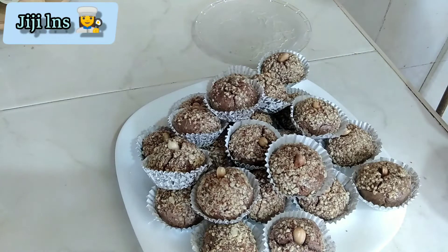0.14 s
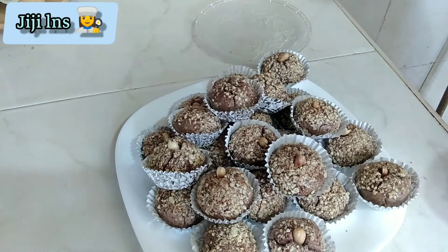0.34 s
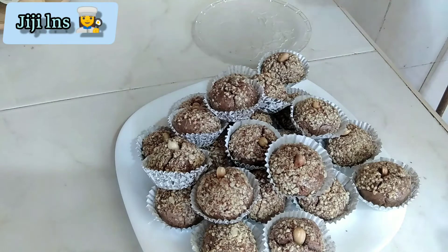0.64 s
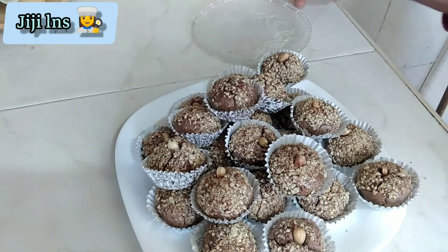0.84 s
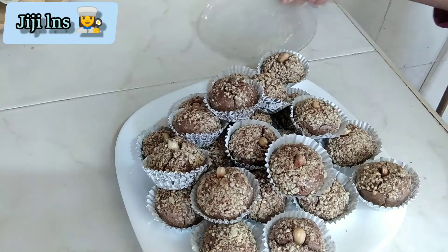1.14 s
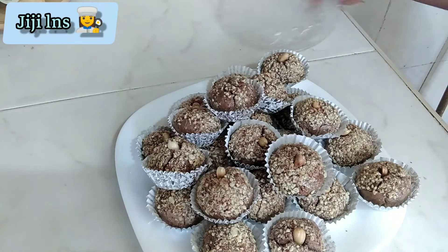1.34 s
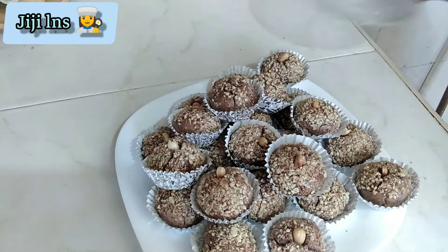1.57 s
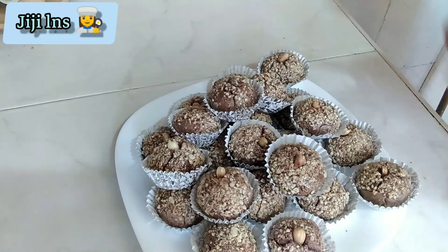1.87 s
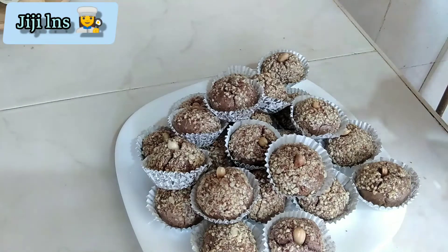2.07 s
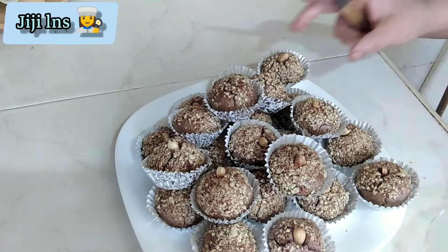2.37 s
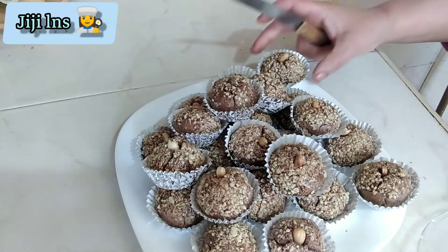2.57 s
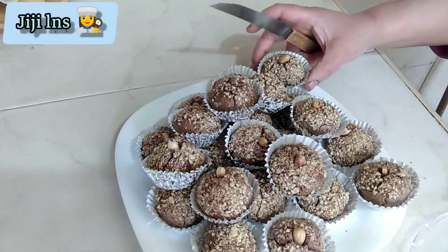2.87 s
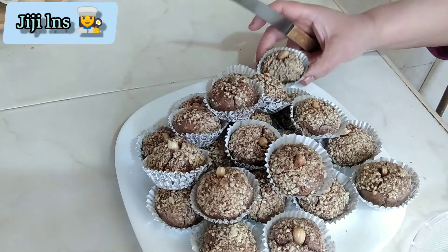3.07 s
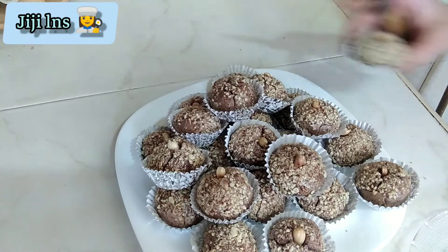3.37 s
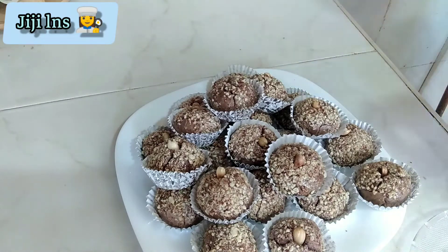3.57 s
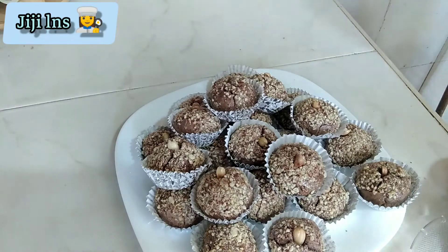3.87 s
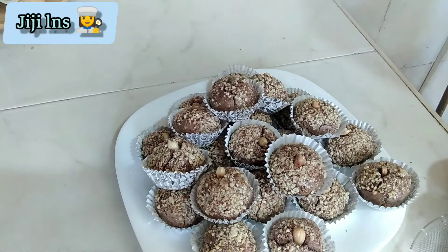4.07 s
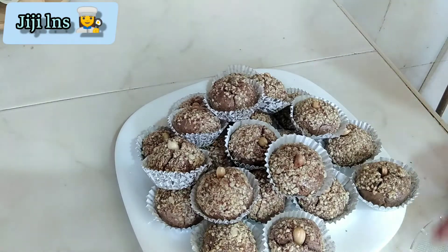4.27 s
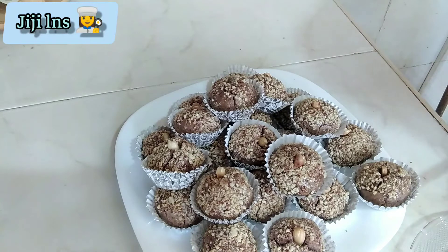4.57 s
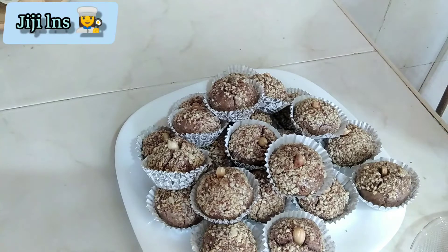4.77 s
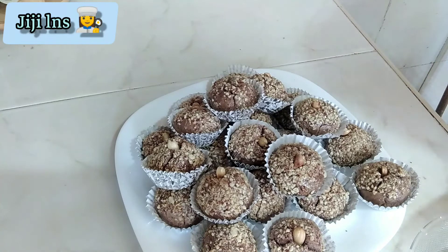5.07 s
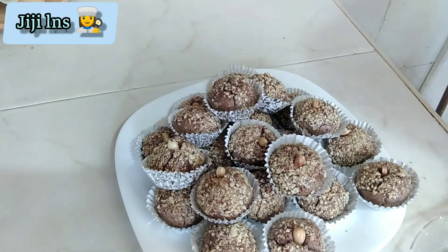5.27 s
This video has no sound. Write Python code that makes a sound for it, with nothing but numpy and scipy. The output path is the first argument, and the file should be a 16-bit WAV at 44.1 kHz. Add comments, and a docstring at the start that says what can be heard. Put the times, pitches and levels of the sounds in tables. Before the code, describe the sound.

A quiet kitchen, heard in stereo through a nearby phone: soft still air, a faint wavering low hum and deeper rumble throughout. The first second has only slight rustles, a short swish near 0.6 s and a faint low judder around 0.9 s. From about 1.15 to 1.45 s a small glass plate drags over tile, gritty and stuttering, its ring catching in little clicks. A lull follows, with a soft swish near 1.9 s. At 2.5 s the plate is set down with a firm glassy clack, then rocks in light irregular taps with faint low notes until 3.35 s; a bright paper cup snap and swish cut in near 3.15 s. A cluster of knocks comes at 3.4-3.47 s, and a hard, bright clink at 3.9 s. Small paper ticks and swishes follow around 4.1-4.5 s, low buzzing judders at 4.8 and 5.15 s, and a very faint last tap near 5.3 s. Short tiled-room echo.

```python
"""A quiet kitchen hums throughout, with still air, soft rustles and brief low judders from the start.
Near 1.2 s the foot ring of a small glass plate drags over a tiled counter: grit scrapes, the ring catches.
From 2.4 s paper cups tick as creases snap; the plate is put down at 2.5 s and rocks to rest with low plate notes.
It is knocked again near 3.4 and 3.9 s, then more paper ticks, swishes, judders and one last light tap follow.
Plate and paper echo off tiled walls, and a phone hears it all through two ports."""
import sys
import numpy as np
from scipy import signal
from scipy.fft import rfft, irfft
from scipy.io import wavfile
from scipy.ndimage import uniform_filter1d

SR = 44100
rng = np.random.default_rng(int(sys.argv[2]) if len(sys.argv) > 2 else 0)


def elevation(decibels):
    """Turn decibel levels (scalar or array-like) into linear amplitude ratios."""
    levels = np.asarray(decibels, float)
    return 10 ** (levels / 20)


def waveform_to_disk(signal):
    """Save audio, clipped to [-1, 1], as 16-bit WAV at the path in sys.argv[1]."""
    frames = np.transpose(np.atleast_2d(signal))
    scaled = np.clip(frames, -1, 1) * 32767
    samples = np.round(scaled).astype(np.int16)
    wavfile.write(sys.argv[1], SR, samples)


N = 238729  # length in samples
T = np.arange(N) / SR  # time in seconds

# Colour of the still air. Each row: frequency in Hz, relative level in dB.
AIR_COLOUR = [(26, -30.5), (45, -6.5), (145, -15), (241, -19.5), (421, -24), (511, -21), (852, -24),
              (962, -25.5), (1140, -25), (1450, -26), (1680, -28.5), (2200, -28.5), (5150, -38.5),
              (12300, -37), (15000, -49)]
# How alike the noise is at the two ports. Each row: frequency in Hz, correlation from -1 to 1.
PORT_LIKENESS = [(60, 0.92), (300, 0.71), (700, 0.96), (1100, -0.32), (1600, -0.17), (5600, 0.44),
                 (6900, 0.81), (10000, 1), (15000, 0.41)]
# Swells of the low hum. Each row: loudest time in seconds, relative level in dB,
# then rise and fall, each in seconds per 20 dB.
HUM_SWELLS = [(.55, -76.5, .2, .9), (1.56, -55, 0.19, .4), (1.94, -66, 0.5, .2), (2.14, -63.5, 0.11, .15),
              (2.66, -52.5, 0.33, .25), (3.69, -57.5, .25, .45), (4.83, -61, .35, .15),
              (5.2, -66.5, .4, .9)]
# Colour of paper and cloth rustle. Each row: frequency in Hz, relative level in dB.
RUSTLE_COLOUR = [(700, -48), (2000, -10), (3200, -10), (6000, -8.5), (7000, -3.5), (10100, -2.5),
                 (12000, -15.5), (14200, -8.5), (15200, -37.5)]
# Paper and sleeve swishes. Each row: loudest time in seconds, relative level in dB,
# then rise and fall, each in seconds per 20 dB.
SWISHES = [(.1, -78.5, 1, 1), (.35, -74.5, 1, 0.054), (.575, -61, 0.041, 0.04), (.62, -105, 0.11, 0.18),
           (.94, -78.5, 0.017, 0.32), (1.945, -68, .03, 0.082), (2.09, -77.5, .06, .2),
           (3.09, -70.5, 0.4, 0.017), (3.175, -46.5, 0.017, 0.039), (3.38, -60, 0.45, 0.13),
           (3.79, -74.5, 0.25, 0.11), (4.224, -59, 0.083, 0.042), (4.27, -75.5, 0.045, .15),
           (4.55, -66, .17, .3), (4.8, -61, 0.032, 0.068), (5.1, -79, 0.45, 0.14), (5.39, -72, .1, .3)]
# A hand or blade judders on the counter. Each row: start in seconds, level in dB, slips per second,
# length in seconds, scuff level in dB relative to the row's level.
JUDDERS = [(0, -73, 110, 0.047, 11.5), (.88, -64, 120, 0.083, -28), (4.777, -54.5, 163, 0.096, -2),
           (5.153, -54, 105, 0.173, -25), (5.27, -76, 105, 0.044, 13)]
# Overtones of a judder. Each row: multiple of the slip rate, relative level in dB.
JUDDER_OVERTONES = [(1, -0.5), (2, -9.5), (3, -19)]
# Colour of a judder's dull scuff. Each row: frequency in Hz, relative level in dB.
SCUFF_COLOUR = [(50, 12.5), (120, 13), (500, 1.5), (1500, -9.5), (3000, -41.5)]
# Ways the glass plate can ring (its modes), as three matching lists:
# frequency in Hz, relative level in dB, and free ring time in seconds to fall 60 dB.
PLATE_HZ = [530, 625, 715, 1080, 1150, 1195, 1247, 1400, 1462, 1575, 1650, 1790, 2000, 2304, 2395, 3010,
            3374, 3444, 3740, 5390, 5455, 5834, 7055, 7845, 7915, 7990, 8080, 9050, 10600, 10895, 14120]
PLATE_DB = [-21, -13.5, -7, -17, -20.5, -9, -5, -7, -14, -6.5, -5, -2, 3.5, 0.5, -10, -2, -4.5, 5, -6.5, -8,
            -7, -17, -24, -15, -8, -0.5, -9, -16.5, -13.5, -14, -16]
PLATE_RING_S = [0.13, 0.066, 0.041, .1, 0.26, 0.11, 0.1, 0.09, 0.13, 0.12, 0.092, 0.045, 0.05, 0.11, 0.095,
                0.041, 0.13, 0.13, 0.1, 0.15, 0.074, 0.24, 0.083, 0.047, 0.061, 0.04, 0.13, 0.097, 0.12,
                0.21, 0.036]
# Scraping strokes. Each row: loudest time in seconds, relative level in dB, rise and fall in seconds per 20 dB,
# then relative levels of the rim modes and the treble modes in dB.
STROKES = [(1.183, -53.5, .05, 0.06, -10, 6.5), (1.235, -52, 0.041, .05, -12, -0.5),
           (1.302, -43.5, 0.094, 0.038, -20, 0.5), (1.409, -45.5, 0.063, 0.056, -12, 4),
           (2.536, -51, 0.0074, 0.19, -10, -23.5), (2.704, -51, 0.09, 0.044, -9, 1.5),
           (3.05, -67, 0.35, 0.11, 8, -24), (3.861, -52.5, 0.011, .04, 5.5, 12.5)]
# Colour of grit under the foot ring. Each row: frequency in Hz, relative level in dB.
GRIT_COLOUR = [(150, -41.5), (350, -9), (600, -0.5), (900, -8.5), (1400, -2), (2400, -1), (4500, -11),
               (5500, -29.5)]
# Colour of a sharp tile crack. Each row: frequency in Hz, relative level in dB.
CRACK_COLOUR = [(3000, -29.5), (4500, 2.5), (6000, -3.5), (9500, -6), (11300, -7.5), (12000, -28),
                (14500, -23.5)]
# Colour of a tile thud. Each row: frequency in Hz, relative level in dB.
THUD_COLOUR = [(150, -35), (300, -13.5), (420, -16), (600, -8), (900, -5.5), (1300, 1), (2200, -14.5),
               (2750, -4.5), (3700, -3), (4500, -28.5)]
# Modes of the counter slab. Each row: frequency in Hz, relative level in dB, seconds to fall 60 dB.
COUNTER_MODES = [(110.5, -25.5, 0.18), (176, -22, 0.066), (313, -15.5, 0.059)]
# The dragged foot ring catches on the tile. Each row: start in seconds, strength in dB,
# relative level of the treble modes in dB.
CATCHES = [(1.18, -34, -22), (1.258, -37, -15), (1.296, -34, -23), (1.318, -30, -37), (1.335, -27.5, -9.5),
           (1.371, -29.5, -25), (1.394, -34.5, -16), (1.424, -38.5, 3.5)]
# The plate is set down or knocked on tile. Each row: start in seconds, strength in dB,
# then relative levels of the rim modes, treble modes and thud in dB.
BLOWS = [(2.481, -21, -7, -2, -2.5), (3.406, -33, 6, -1.5, 4), (3.454, -29, 1, -2, 4),
         (3.468, -30, -19, -31, -1), (3.874, -20, 5, 8, 1.5), (3.953, -44, -3, 8.5, -8)]
# Light taps as the plate rocks or is nudged. Each row: start in seconds, strength in dB,
# relative level of the treble modes in dB.
TAPS = [(2.633, -38, -12), (2.669, -36.5, -26), (2.705, -33, -11.5), (2.765, -38, -14.5), (2.835, -39, -21),
        (2.868, -37.5, -24), (2.906, -49, -17), (2.945, -41.5, -15), (2.979, -40.5, -14.5),
        (3.016, -37, -23), (3.067, -43, -25), (3.091, -42, -20), (3.167, -39, -7), (3.228, -44.5, -16),
        (3.261, -45.5, -18), (3.315, -48, -10), (3.346, -47.5, -15), (5.282, -54, -30)]
# Paper cup ticks. Each row: start in seconds, strength in dB.
TICKS = [(2.4082, -51), (2.8697, -43.5), (3.04, -46.5), (3.0846, -48), (3.1246, -38.5), (3.1364, -44),
         (3.1448, -26.5), (4.0727, -40), (4.2072, -37), (4.222, -37.5), (4.281, -51), (4.3038, -50.5),
         (4.4826, -50), (4.5424, -44), (4.9576, -56.5), (5.1108, -57.5), (5.1806, -47.5), (5.2804, -49),
         (5.3727, -53)]
# Low notes of the plate as it rocks. Each row: frequency in Hz, relative starting level in dB,
# change in dB per second.
LOW_PLATE_NOTES = [(563, -59, -24), (720, -67.5, 9.5)]
# Echo time of the kitchen. Each row: frequency in Hz, seconds to fall 60 dB.
ROOM_FADE = [(100, 0.5), (1000, 0.35), (4000, 0.31), (12000, 0.24)]
# Tilt between the ports. Each row: frequency in Hz, left minus right in dB.
LEFT_TILT = [(60, -1.5), (3000, 0.5), (7500, -3), (8600, -5.5), (9600, 8), (12000, 5), (15000, 2.5)]


def along(table, hz):
    """Read a (Hz, value) table on a logarithmic frequency axis."""
    f, v = np.transpose(table)
    return np.interp(np.log(np.maximum(hz, 1)), np.log(f), v)


def colour(x, table):
    """Filter a sound by a (Hz, dB) table."""
    size = x.shape[-1]
    gain = elevation(along(table, np.fft.rfftfreq(size, 1 / SR)))
    return irfft(rfft(x) * gain, size)


def unit(x):
    """Scale a sound to an average strength (rms) of 1."""
    return x / np.sqrt(np.mean(x ** 2))


def diffuse(size):
    """White noise from all round: the ports share only part of each band."""
    alike = np.clip(along(PORT_LIKENESS, np.fft.rfftfreq(size, 1 / SR)), -.99, .99)
    shares = np.sqrt([(1 + alike) / 2, (1 - alike) / 2])
    mid, side = rfft(rng.standard_normal((2, size))) * shares
    return irfft(np.array([mid + side, mid - side]), size)


def walk(rate):
    """Random levels, drawn about rate times a second and joined by slopes."""
    k = int(SR / rate)
    steps = np.repeat(rng.standard_normal(N // k + 1), k)
    return uniform_filter1d(steps, k)[:N]


def add(out, s, x):
    """Mix a short sound in at time s."""
    i = int(s * SR)
    out[..., i:i + x.shape[-1]] += x[..., :N - i]


def swell(s, db, rise_s, fall_s):
    """Gain that climbs to db at time s and dies away, 20 dB per rise_s and fall_s."""
    before = (s - T) / max(rise_s, .001)
    after = (T - s) / max(fall_s, .001)
    return elevation(db - 20 * np.where(T < s, before, after))


def fade(t, seconds):
    """Gain that falls 60 dB in the given time."""
    return 1000. ** (-t / seconds)


def still_air():
    """Steady noise from all round, with a slowly wandering level."""
    return unit(colour(diffuse(N), AIR_COLOUR)) * elevation(-65.5 + .7 * walk(1.5))


def low_noise(low_hz, high_hz):
    """A narrow band of low noise with an rms of 1."""
    band = signal.butter(2, [low_hz, high_hz], "bandpass", fs=SR, output="sos")
    return unit(signal.sosfilt(band, rng.standard_normal(N)))


def drone():
    """A wavering hum, part tone and part narrow noise, over a deeper rumble."""
    noise = low_noise(73, 83)
    hum_hz = 78.3 + 2.38 * walk(6)
    tone = np.sin(2 * np.pi * np.cumsum(hum_hz) / SR)
    hum_gain = elevation(-78.5) + sum(swell(*row) for row in HUM_SWELLS)
    rumble = low_noise(19, 33) * elevation(-61.5 + 2.5 * walk(5))
    return (.6 * noise + 1.1 * tone) * hum_gain + rumble


def rustle():
    """Dense tiny crackles of paper and cloth; each paper tick also leaves a short rustle."""
    crackle_db = 2.4 * np.minimum(rng.exponential(1, N), 8)  # capped random spikes
    grain = diffuse(N) * elevation(1.36 * walk(51) + crackle_db)
    # 18.5 dB under each tick's strength, falling 20 dB in 0.018 s
    after_ticks = sum(swell(s, db - 18.5, 0, 0.018) for s, db in TICKS)
    gain = elevation(-90.5) + sum(swell(*row) for row in SWISHES) + after_ticks
    return unit(colour(grain, RUSTLE_COLOUR)) * gain * elevation(3.5)


def judders():
    """Brief low buzzes from sticking and slipping, with a dull scuff."""
    out = np.zeros(N)
    for s, db, rate, length, scuff_db in JUDDERS:
        t = T[:int(length * SR)]
        buzz = sum(elevation(d) * np.cos(2 * np.pi * k * rate * t) for k, d in JUDDER_OVERTONES)
        scuff = unit(colour(rng.standard_normal(len(t)), SCUFF_COLOUR))
        rise_and_fall = np.sin(np.pi * t / length)
        add(out, s, elevation(db) * (buzz + elevation(scuff_db) * scuff) * rise_and_fall)
    return out


def contact(hz, rim_db, treble_db, from_hz, octaves):
    """Gain of a mode: low bending modes stay full, rim_db phases in above from_hz, treble_db rules over 4500 Hz."""
    rim = np.clip(np.log2(hz / from_hz) / octaves, 0, 1)
    return elevation(np.where(hz > 4500, treble_db, rim * rim_db))


def scrape():
    """Grit under the foot ring catches and slips, shaking all the plate's modes."""
    push = np.array([swell(*row[:4]) for row in STROKES]) + 1e-9
    spikes_db = 3.8 * np.minimum(rng.exponential(1, N), 7)
    patchy_noise = rng.standard_normal(N) * elevation(5 * walk(60) + spikes_db)
    grit = unit(patchy_noise) * push.sum(0)
    # where strokes overlap, the stronger one has more say in the tone
    rim_db, treble_db = np.array(STROKES)[:, 4:].T @ push / push.sum(0)
    out = elevation(-6.0) * colour(grit, GRIT_COLOUR)
    out = out + elevation(treble_db - 12) * colour(grit, CRACK_COLOUR)
    for hz, db, ring_s in zip(PLATE_HZ, PLATE_DB, PLATE_RING_S):
        # a resonator rings at hz for 0.8 of its free time
        r = fade(1, ring_s * 0.8 * SR)
        w = 2 * np.pi * hz / SR
        drive = grit * contact(hz, rim_db - 7.0, treble_db, from_hz=1900, octaves=0.33)
        feed = [2 * np.sqrt(1 - r) * np.sin(w)]
        mode = signal.lfilter(feed, [1, -2 * r * np.cos(w), r * r], drive)
        out = out + elevation(db - 3.5) * mode
    return out


def touches():
    """List plate touches: time, strength, rim dB, treble dB, share of free ring time, thud dB, rim octaves."""
    catches = [(s, db, -18, treble, 0.53, -6.5, 1.62) for s, db, treble in CATCHES]
    blows = [(s, db, rim, treble, .5, thud, 1.29) for s, db, rim, treble, thud in BLOWS]
    taps = [(s, db, -33.5, treble, 0.6, -13, 1.37) for s, db, treble in TAPS]
    return catches + blows + taps


def knocks():
    """Each touch rings every mode at its own strength, over a short thud and crack of the tile."""
    out, t = np.zeros(N), T[:SR // 3]
    hz, db, ring_s = np.array([PLATE_HZ, PLATE_DB, PLATE_RING_S])[:, :, None]
    for s, strength_db, rim_db, treble_db, ring_share, thud_db, octaves in touches():
        # level, pitch and starting phase differ a little each time
        luck = rng.standard_normal((3, len(hz), 1))
        gain = elevation(db + 1.4 * luck[0]) * contact(hz, rim_db, treble_db, from_hz=1180, octaves=octaves)
        touch_hz = hz * (1 + .002 * luck[1])
        tones = np.sin(2 * np.pi * (touch_hz * t + 0.21 * luck[2]))
        modes = gain * tones * fade(t, ring_s * ring_share)

        thud = unit(colour(rng.standard_normal(len(t)), THUD_COLOUR))
        crack = unit(colour(rng.standard_normal(len(t)), CRACK_COLOUR))
        tile = elevation(thud_db - 3.5) * thud * (fade(t, .06) + 1.95 * fade(t, .008))
        tile = tile + elevation(treble_db - 13.0) * crack * fade(t, .04)
        # a solid thud moves the slab itself
        slab = sum(elevation(d) * np.sin(2 * np.pi * f * t) * fade(t, slab_s) for f, d, slab_s in COUNTER_MODES)
        tile = tile + elevation(1.5 * thud_db) * slab

        # a light touch pushes for longer than a hard blow
        rise_s = 0.00038 * elevation(-.8 * (strength_db + 15.5))
        rise = 1 - np.exp(-t / rise_s)
        add(out, s, elevation(strength_db) * rise * (elevation(3.5) * modes.sum(0) + tile))
    return out


def paper():
    """Creases snap as bright ticks with a short crinkle behind; a bigger crease reaches lower."""
    out, t = np.zeros(N), T[:SR // 8]
    for s, strength_db in TICKS:
        low_hz = 4800 * elevation(-.25 * (strength_db + 52))
        band = signal.butter(2, [low_hz, 12500], "bandpass", fs=SR, output="sos")
        snap_and_crinkle = fade(t, 0.0041) + 0.62 * fade(t, 0.023)
        burst = rng.standard_normal(len(t)) * snap_and_crinkle
        add(out, s, elevation(strength_db - 6) * signal.sosfilt(band, burst))
    return out


def low_plate_notes():
    """Low plate notes near 560 and 720 Hz, set off again by each tap as it rocks; the lower dies as the upper grows."""
    rocks_from_s, rocks_to_s = 2.7, 3.4
    taps = np.array(TAPS)[:, 0]
    since_tap = T - taps[np.maximum(np.searchsorted(taps, T) - 1, 0)]
    pulse = 0.34 + 3.3 * fade(np.abs(since_tap), 0.039)
    # fades in by 20 dB per 0.071 s, then stops
    gate = elevation(-20 * np.maximum(rocks_from_s - T, 0) / 0.071) * (T < rocks_to_s)
    out = 0
    for hz, db, db_per_s in LOW_PLATE_NOTES:
        phase = 2 * np.pi * hz * T
        wavering_note = (0.25 + walk(50)) * np.sin(phase) + walk(49) * np.cos(phase)
        out = out + elevation(db + db_per_s * (T - rocks_from_s)) * wavering_note
    return gate * pulse * out


def room(x, right_lag_s):
    """Direct sound reaches the right port after right_lag_s; tiled walls add an echo, shorter in the treble."""
    size = SR // 2
    f, t, z = signal.stft(diffuse(size), SR, nperseg=256)
    z = z * fade(t, along(ROOM_FADE, f)[:, None])
    tail = signal.istft(z, SR, nperseg=256)[1][:, :size]
    build_up = np.clip(T[:size] / 0.0013, 0, 1)
    tail = elevation(-5.5) * unit(tail) / np.sqrt(size) * build_up
    # the direct sound at each port
    tail[0, 0] += 1
    tail[1, int(right_lag_s * SR)] += 1
    return signal.fftconvolve(x[None], tail, axes=1)[:, :N]


def scene():
    """The plate lies off to one side, the paper square to both ports; still air lies under all."""
    background = still_air() + drone() + rustle() + judders()
    plate = room(scrape() + knocks() + low_plate_notes(), right_lag_s=.00018)
    cups = room(paper(), right_lag_s=0)
    return background + plate + cups


def band_limit(x):
    """A steep low-pass at the top of the band."""
    return signal.sosfilt(signal.butter(12, 15840, fs=SR, output="sos"), x)


def record(dry):
    """The loudest peaks are rounded, the ports get their different tone, and the top is cut at 14400 Hz."""
    overload = .75  # no peak passes this level here
    soft = overload * np.tanh(dry / overload)
    half_tilt = np.array(LEFT_TILT) * [1, .5]  # each port takes half the difference
    left = colour(soft[0], half_tilt)
    right = colour(soft[1], half_tilt * [1, -1])
    top_cut = signal.ellip(6, .5, 18, 14400, fs=SR, output="sos")
    ports = signal.sosfilt(top_cut, np.array([left, right]))
    return band_limit(ports)


dry = scene()
out = record(dry)
waveform_to_disk(out)
```